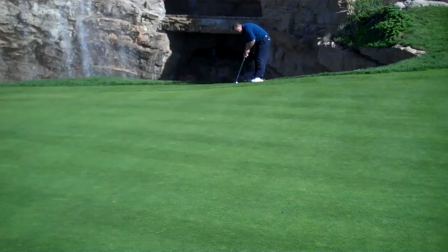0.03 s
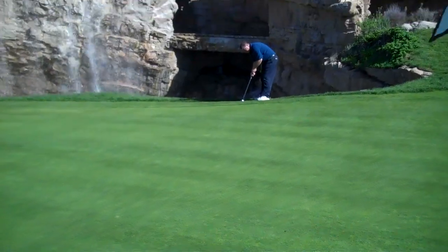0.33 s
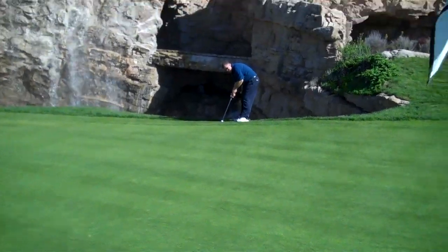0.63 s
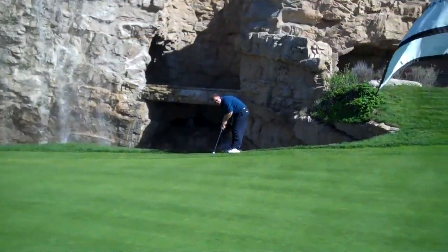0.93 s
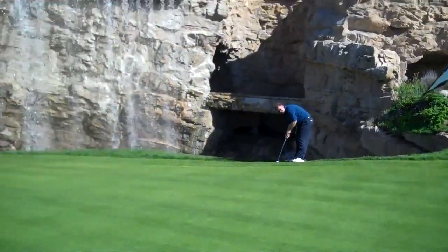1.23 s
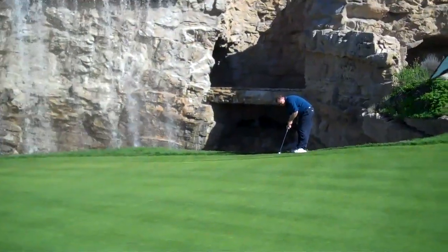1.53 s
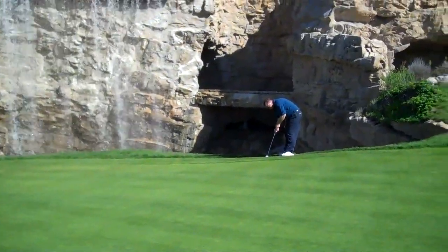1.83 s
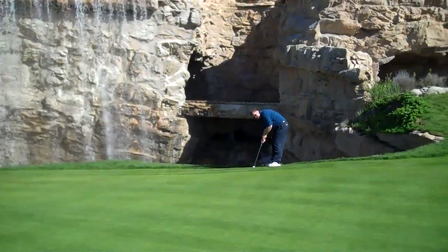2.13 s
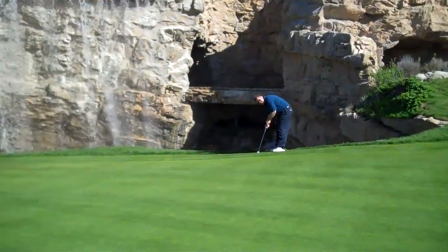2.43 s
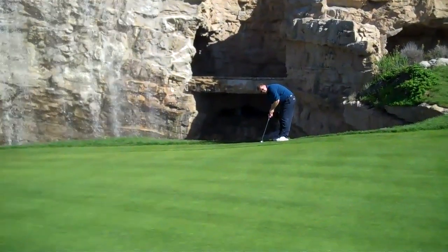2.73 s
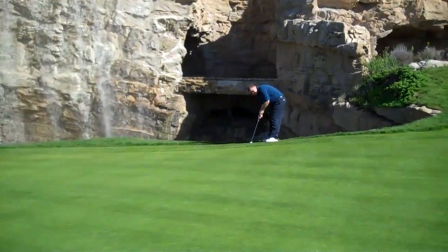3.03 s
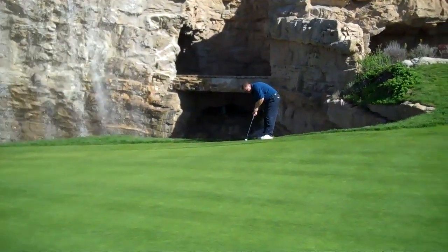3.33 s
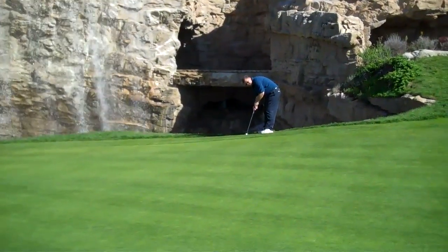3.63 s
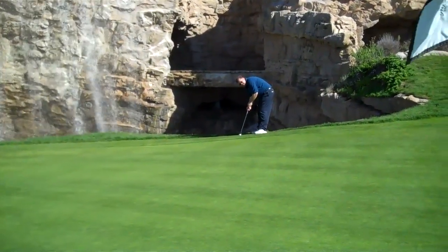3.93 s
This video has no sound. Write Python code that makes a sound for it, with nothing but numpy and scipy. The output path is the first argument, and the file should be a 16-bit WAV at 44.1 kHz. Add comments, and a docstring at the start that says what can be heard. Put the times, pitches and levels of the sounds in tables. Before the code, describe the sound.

A waterfall pours down a rock wall, heard from across a golf green. It starts with a soft thump, then keeps up an even roar and hiss of spray. Near the end, faint wind brushes the microphone.

```python
"""Waterfall beyond a golf green

Across the green, water pours down a rock wall: a roar from the pool, a hiss of spray, countless droplets.
The camera's two microphone ports resonate in the treble. They face the grass at first, then the wall.
The sound switches on with a soft thump and an uneven level; near the end, wind brushes the ports."""
import sys
import numpy as np
from scipy import signal
from scipy.fft import rfft, irfft, next_fast_len
from scipy.io import wavfile
from scipy.ndimage import uniform_filter1d, map_coordinates

SR = 44100
rng = np.random.default_rng(int(sys.argv[2]) if len(sys.argv) > 2 else 0)


def store_pcm(level_fs):
    """Save levels as 16-bit WAV."""
    pcm = np.round(np.clip(level_fs, -1, 1) * 32767).astype(np.int16)
    wavfile.write(sys.argv[1], SR, np.atleast_2d(pcm).T)


N = 176400

# Level steps as the microphone switches on. Each row: start in seconds, gain in dB.
SWITCH_ON_STEPS = [(.117, -1.5), (0.147, -5.5), (.188, 0.86), (.293, -2), (.378, 0.5)]
# The pool's roar, rippled by its reflection off the ground. Each row: frequency in Hz, relative dB.
ROAR_SPECTRUM = [(25, -30), (45, -18.5), (80, -15.5), (130, -7.5), (190, -7), (270, -4.5), (345, -8),
                 (420, -7), (520, -0.5), (610, -1), (790, -6.5), (920, -1.5), (1050, -3), (1260, -6.5),
                 (1500, -3), (2000, -6), (3000, -11.5), (6000, -43)]
# Spray on the rock wall. Each row: frequency in Hz, relative dB.
SPRAY_SPECTRUM = [(500, -35), (1200, -15.5), (2100, -1), (2900, 1.5), (4000, 1.5), (5200, 1), (6200, -0.04),
                  (7400, -2.4), (9000, -4), (11000, -3.5), (14000, -1.3)]
# The spray's slow drift. Each row: time in seconds, gain in dB.
SPRAY_DRIFT = [(0.4, -20), (0.71, -21), (2.0, -19), (2.47, -20.5), (2.53, -18.5), (2.54, -20), (2.97, -19),
               (3.22, -20.5), (3.25, -19.5), (3.55, -20.5), (4.0, -19)]
# Slaps of water on rock. Each row: peak time in seconds, boost to the spray in dB, half-width in seconds.
ROCK_SLAPS = [(.338, 6.5, 0.0018), (0.39, 2.5, 0.0044), (.43, 1, 0.025), (1.254, 2, 0.011),
              (1.685, 4.5, 0.0011)]
# The fall's width from across the green. Each row: frequency in Hz, left-right correlation.
STEREO_LIKENESS = [(30, .55), (90, 0.87), (160, 1), (280, 0.94), (560, 0.98), (1250, 0.92), (1750, 0.91),
                   (2300, 0.69), (4200, 0.59), (6500, 0.55), (8000, 0.4), (9700, .08)]
# Colour with the microphone facing the grass. Each row: frequency in Hz, left and right gain in dB.
GRASS_COLOUR = [(197, 0.8, 1), (800, -1, -1.4), (2860, -0.5, -1), (5500, 0, -0.5), (7400, 1.6, -3.5),
                (9000, -1.3, 1.5), (11500, -2, -2)]
# The port cavities, left then right. Each row: resonance in Hz, Q.
PORT_RESONANCES = [(7410, 6.55), (6350, 3.96)]
# The camera shadows the right port. Each row: frequency in Hz, gain in dB.
RIGHT_SHADOW = [(1900, 0), (3000, -4), (4000, -4.5), (5000, -3.5), (6300, 0), (7000, -0.5), (8000, -2.5),
                (10800, -8), (12000, -12), (14000, -21)]
# The water reaches the right port later. Each row: frequency in Hz, phase lag in radians.
RIGHT_LAG = [(500, .04), (1900, 0.16), (2700, 0.88), (3700, .3), (5000, .5), (6000, 0.73), (6700, 1.13),
             (8000, 1.04)]
# Puffs at the microphone. Each row: peak time and half-width in seconds, left and right level in dB.
WIND_PUFFS = [(3.72, .03, -60, -50), (3.79, 0.023, -38, -49), (3.88, .1, -58, -43),
              (3.93, 0.022, -48.5, -41)]
# Wind rumble on the ports. Each row: frequency in Hz, relative dB.
WIND_SPECTRUM = [(20, -2), (45, -2), (75, -1), (140, -9), (250, -19), (600, -45)]

THUMP_GAIN_DB, THUMP_RISE_S, THUMP_DECAY_S = -20, 0.04, 0.13
ROAR_GAIN_DB, HISS_GAIN_DB, DROPS_GAIN_DB = -28.5, -1.48, -11.5
DROPS_PER_S, DROP_CENTRE_HZ, DROP_Q, DROP_SPREAD_DB = 4000, 5930, 1.7, 2
RAISE_MIDPOINT_S, RAISE_LENGTH_S = 0.83, 0.093
FULL_LEVEL, TOP_HZ = 0.92, 14250


def amp(db):
    """Decibels to gain."""
    return 10 ** (np.asarray(db) / 20)


def unit_rms(x):
    """Scaled to rms 1."""
    return x / np.sqrt(np.mean(x ** 2) + 1e-20)


def along(points, hz):
    """(Hz, value) points joined on a log frequency axis."""
    knots_hz, values = np.transpose(points)
    return np.interp(np.log(hz + 1), np.log(knots_hz + 1), values)


def clock():
    """Time of each sample in seconds."""
    return np.arange(N) / SR


def swell(peak_s, half_width_s):
    """A bell-shaped rise and fall around a moment."""
    return np.exp(-0.5 * ((clock() - peak_s) / half_width_s) ** 2)


def wobble(knots_per_s):
    """A smooth random curve."""
    return map_coordinates(rng.standard_normal(N // 20), [clock() * knots_per_s + 2])


def filtered(x, response):
    """x through a complex frequency response."""
    size = next_fast_len(N + SR // 2)
    hz = np.fft.rfftfreq(size, 1 / SR)
    return irfft(rfft(x, size) * response(hz), size)[..., :N]


def patchy_noise(depth_db):
    """Two noises with shared patches of random gain in frequency and time."""
    spectra = signal.stft(rng.standard_normal((2, N)), nperseg=512)[2]
    patches = uniform_filter1d(rng.standard_normal(spectra.shape[1:]), size=12, axis=0)
    patches = uniform_filter1d(patches, size=9, axis=1)
    return signal.istft(spectra * amp(depth_db * unit_rms(patches)), nperseg=512)[1][:, :N]


def spread(pair, spectrum):
    """Two unrelated signals become one wide, coloured source of rms 1."""
    def mid_side_gains(hz):
        angle = np.arccos(np.clip(along(STEREO_LIKENESS, hz), -1, 1)) / 2
        return amp(along(spectrum, hz)) * [np.cos(angle), np.sin(angle)]
    mid, side = filtered(pair, mid_side_gains)
    return unit_rms(np.array([mid + side, mid - side]))


def switch_on_gain():
    """The microphone is silent, then comes on in uneven, slightly rounded steps."""
    starts, steps_db = np.transpose(SWITCH_ON_STEPS)
    gain = np.append(0, amp(steps_db))[np.searchsorted(starts, clock())]
    return uniform_filter1d(gain, size=100)


def switch_on_thump():
    """Switching on gives one soft pulse, of opposite sign in the two channels."""
    age = np.maximum(clock() - SWITCH_ON_STEPS[0][0], 0)
    pulse = amp(THUMP_GAIN_DB) * (1 - np.exp(-age / THUMP_RISE_S)) * np.exp(-age / THUMP_DECAY_S)
    return np.outer([-1, 1], pulse)


def pool_roar():
    """Beyond the green, water plunges into the pool and churns."""
    churn_db = 0.43 * wobble(3) + 0.75 * wobble(17)
    return amp(ROAR_GAIN_DB + churn_db) * spread(patchy_noise(depth_db=0.36), ROAR_SPECTRUM)


def droplets():
    """Each droplet is a ping of a few cycles; most are small, and their size is capped."""
    count = int(DROPS_PER_S * N / SR)
    when, pitch, size = rng.random((count, 3)).T[:, :, None]
    offsets = np.arange(SR // 400)
    ping_hz = DROP_CENTRE_HZ * 2 ** (2 * pitch - 1)  # within an octave either way
    cycles = ping_hz * offsets / SR
    size_db = np.minimum(-DROP_SPREAD_DB * np.log(1 - size), 15)
    pings = amp(size_db) * np.sin(2 * np.pi * cycles) * np.exp(-np.pi * cycles / DROP_Q)
    positions = (when * N).astype(int) + offsets
    return np.bincount(positions.ravel(), pings.ravel(), N)[:N]


def spray():
    """Sheets of water break on the rock wall: a fluttering hiss with droplets in it."""
    drift_db = np.interp(clock(), *np.transpose(SPRAY_DRIFT))
    flutter_db = 0.19 * wobble(26.5) + 0.2 * wobble(110)
    slaps_db = sum(db * swell(peak_s, half_width_s) for peak_s, db, half_width_s in ROCK_SLAPS)
    hiss = amp(HISS_GAIN_DB) * spread(patchy_noise(depth_db=0.9), SPRAY_SPECTRUM)
    drops = amp(DROPS_GAIN_DB) * spread(np.array([droplets(), droplets()]), SPRAY_SPECTRUM)
    return amp(drift_db + flutter_db + slaps_db) * (hiss + drops)


def port_response(hz):
    """Each microphone port is a small resonant cavity; the right one is shaded and hears later."""
    left, right = [1 / (1 - (hz / centre) ** 2 + 1j * hz / (centre * q)) for centre, q in PORT_RESONANCES]
    shadow = amp(along(RIGHT_SHADOW, hz))
    lag = np.exp(-1j * along(RIGHT_LAG, hz))
    return np.array([left, right * shadow * lag])


def raise_microphone(water):
    """The water's colour opens up as the microphone turns from the grass to the wall."""
    colour = np.array(GRASS_COLOUR)
    facing_grass = filtered(water, lambda hz: amp([along(colour[:, [0, side]], hz) for side in (1, 2)]))
    raised = np.clip((clock() - RAISE_MIDPOINT_S) / RAISE_LENGTH_S + 0.5, 0, 1)
    return facing_grass + raised * (water - facing_grass)


def wind():
    """Right at the microphone, puffs buffet each port on its own."""
    strength = sum(np.outer(amp([left_db, right_db]), swell(peak_s, half_width_s))
                   for peak_s, half_width_s, left_db, right_db in WIND_PUFFS)
    rumble = filtered(rng.standard_normal((2, N)), lambda hz: amp(along(WIND_SPECTRUM, hz)))
    return strength * unit_rms(rumble)


def scene():
    """The waterfall as the ports hear it from across the green, and the wind on them."""
    water = raise_microphone(pool_roar() + spray())
    return filtered(water, port_response) + wind()


def record(dry):
    """The microphone switches on; any peak past full level is flattened, and the top treble is cut."""
    heard = dry * switch_on_gain() + switch_on_thump()
    return filtered(np.clip(heard, -FULL_LEVEL, FULL_LEVEL), lambda hz: hz < TOP_HZ)


dry = scene()
out = record(dry)
store_pcm(out)
```